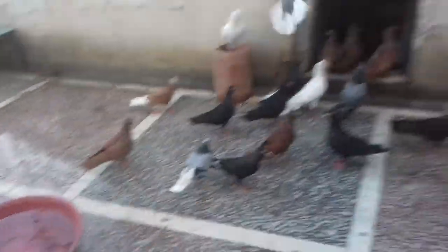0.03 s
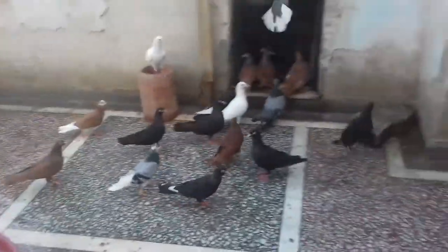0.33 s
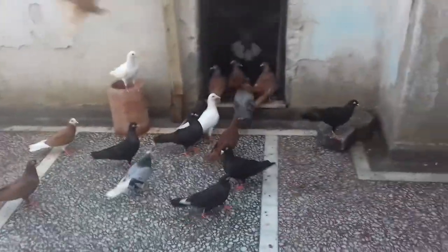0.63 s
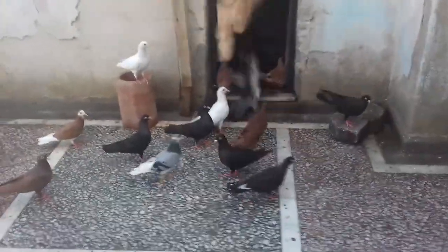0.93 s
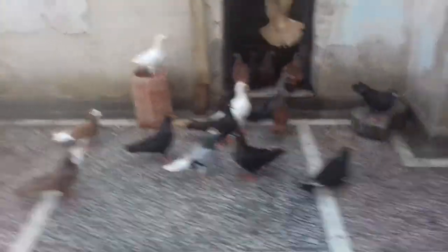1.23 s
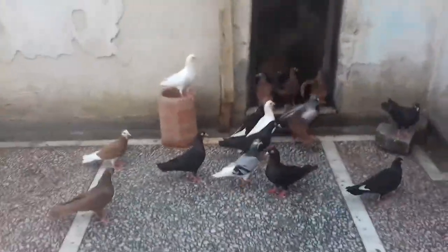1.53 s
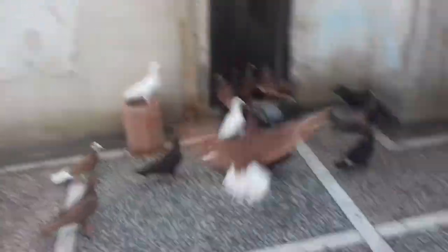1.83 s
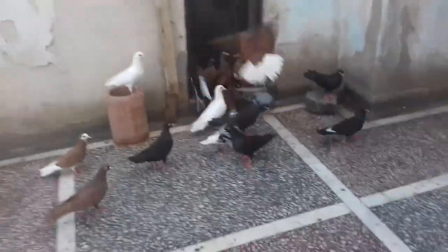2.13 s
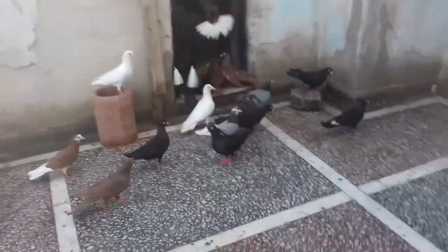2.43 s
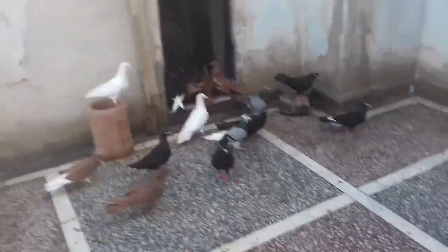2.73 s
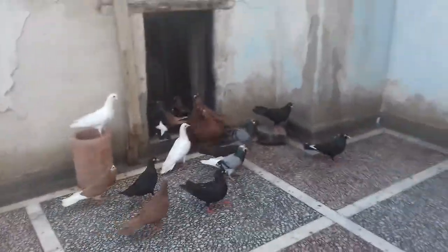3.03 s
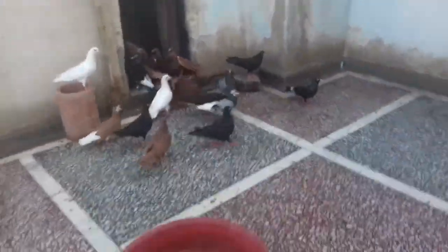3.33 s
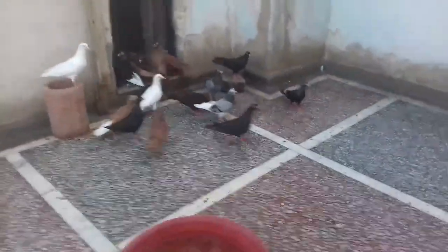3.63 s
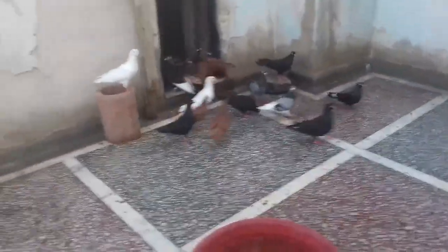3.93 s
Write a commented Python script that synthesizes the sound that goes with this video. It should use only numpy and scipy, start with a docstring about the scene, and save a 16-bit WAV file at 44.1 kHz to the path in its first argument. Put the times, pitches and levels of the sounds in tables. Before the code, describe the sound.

Pigeons flapping their wings on a terrace, with light scuffs, thin squeaks and background hiss.

```python
"""Pigeons crowd round a doorway on a walled terrace. First some fly in: wing tips clap, air swishes
through feathers, faint coos sound among them. From 2 s claws and beaks scuff the stone and young birds
squeak. From 3.2 s one bird beats its wings about ten times a second. The walls throw back short echoes;
outdoor hiss and distant town noise lie under it all."""
import sys
import numpy as np
from scipy import signal
from scipy.fft import rfft, irfft
from scipy.io import wavfile

SR = 44100
rng = np.random.default_rng(int(sys.argv[2]) if len(sys.argv) > 2 else 0)


def log_audio(samples):
    """Write samples as a 16-bit WAV file to the path given in sys.argv[1]."""
    # one column per channel
    frames = np.atleast_2d(samples).T
    # limit to full scale, then quantise
    limited = np.clip(frames, -1, 1)
    pcm = np.round(limited * 32767).astype(np.int16)
    wavfile.write(sys.argv[1], SR, pcm)


N = 176400
T = np.arange(N) / SR

# bright edge of feather noise: freq_hz, level_db
FEATHER_SPECTRUM = [(2500, -4.5), (4500, 11), (6000, 3.5), (7200, 1), (8100, 1), (9500, -5), (11500, -18.5),
                    (16000, -26)]
# body of a wing swish: freq_hz, level_db
SWISH_SPECTRUM = [(150, -60), (600, -10.5), (1500, -13), (2600, -10), (3500, 3), (4100, -3), (5000, -25.5),
                  (6500, -25.5), (9000, -63)]


def from_db(db):
    """Decibels to gain."""
    return 10 ** (np.asarray(db) / 20)


def unit_rms(x):
    """Scale to unit rms."""
    return x / np.sqrt(np.mean(x ** 2) + 1e-20)


def gain_curve(points):
    """Gain over time from rows of time_s, level_db."""
    return from_db(np.interp(T, *np.transpose(points)))


def noise(spectrum):
    """Unit-rms noise shaped by rows of freq_hz, level_db; steep skirts past both ends."""
    freq_hz, level_db = np.transpose(spectrum)
    bins_hz = np.maximum(np.arange(N // 2 + 1) * SR / N, 1)
    skirts = np.minimum(1, np.minimum(bins_hz / freq_hz[0], freq_hz[-1] / bins_hz)) ** 6
    gain = from_db(np.interp(np.log(bins_hz), np.log(freq_hz), level_db))
    return unit_rms(irfft(rfft(rng.standard_normal(N)) * skirts * gain, N))


def drift(corner_hz):
    """Unit-rms random wander, mostly below corner_hz."""
    bins_hz = np.arange(N // 2 + 1) * SR / N
    return unit_rms(irfft(rfft(rng.standard_normal(N)) / (1 + (bins_hz / corner_hz) ** 2), N))


def burst(carrier, start_s, rise_s, hold_s, decay_s):
    """Noise gated by rise, hold and exponential decay; unit rms at the top."""
    age_s = T - start_s
    envelope = np.clip(age_s / rise_s, 0, 1) * np.exp(-np.clip((age_s - rise_s - hold_s) / decay_s, 0, 20))
    gated = carrier * envelope
    return gated * np.sqrt(np.sum(envelope ** 2) / (np.sum(gated ** 2) + 1e-20))


def wing_claps():
    """Wing tips slap together: a crack of a few milliseconds with a bright edge."""
    # claps: start_s, level_db, edge_re_body_db, decay_s
    claps = [(.0718, -14.5, -12.5, 0.0065), (0.1807, -7, -13, 0.0038), (0.302, -9, -8, 0.0037),
             (0.34, -20.5, -10, 0.0084), (0.4503, -18.5, -9, .004), (0.472, -18, -10.5, 0.0047),
             (0.6724, -21, -7, 0.0049), (1.2008, -18, -14.5, 0.0021), (1.611, -19, -14, 0.0043),
             (1.656, -26, -17, 0.0056), (2.7604, -20, -18, 0.0009)]
    # body of the crack: freq_hz, level_db
    body_spectrum = [(100, -37), (350, -24.5), (550, -13), (900, -12), (1400, -19.5), (2300, -6.5),
                     (2850, -8.5), (3450, 5.5), (3850, -1), (4600, -20), (6000, -27), (9000, -66)]
    body, edge, out = noise(body_spectrum), noise(FEATHER_SPECTRUM), 0
    for start_s, level_db, edge_db, decay_s in claps:
        crack = body + from_db(edge_db) * edge
        out += from_db(level_db) * burst(crack, start_s, rise_s=0.0011, hold_s=0.001, decay_s=decay_s)
    return out


def wing_beats():
    """Full, softer beats: a feathery slap with a push of air under it."""
    # beats: start_s, level_db, edge_re_body_db, push_re_body_db
    beats = [(0.938, -18, -12, -11), (3.2014, -26.5, -12.5, -6.5), (3.294, -23, -16.5, -7.5),
             (3.385, -21.5, -20, -17), (3.606, -27, -19, -12), (3.7105, -24, -9.5, -2),
             (3.807, -24.5, -17, -2.5), (3.91, -27, -15, -8)]
    # pushed air: freq_hz, level_db
    push_spectrum = [(200, -13), (500, -8.5), (1000, -7), (1800, 1), (2600, 6.5), (3500, -2)]
    body, edge, push, out = noise(SWISH_SPECTRUM), noise(FEATHER_SPECTRUM), noise(push_spectrum), 0
    for start_s, level_db, edge_db, push_db in beats:
        slap = body + from_db(edge_db) * edge + from_db(push_db) * push
        out += from_db(level_db) * burst(slap, start_s, rise_s=0.0032, hold_s=0.0017, decay_s=0.0082)
    return out


def wing_strokes():
    """Air through feathers swells and fades, grainy as they slide over each other."""
    # soft strokes: peak_s, level_db, edge_re_body_db, decay_s
    strokes = [(0.06, -30, -24, 0.008), (.085, -34, -25, .018), (0.124, -30.5, -26, .012),
               (0.145, -39, -2, 0.0091), (0.239, -30, -22, .008), (0.394, -24.5, -11, 0.0089),
               (0.578, -33.5, -18, 0.029), (0.689, -29, -19.5, 0.039), (0.727, -32, -24, 0.0062),
               (0.754, -30, -18, 0.013), (0.804, -25, -11.5, 0.0077), (0.832, -33, -19, 0.015),
               (0.852, -25, -20.5, .014), (0.888, -32, -11, 0.016), (0.982, -29, -23, 0.018),
               (1.069, -27.5, -15, 0.012), (1.105, -24.5, -10.5, 0.014), (1.178, -31.5, -8, 0.0095),
               (1.286, -24.5, -14, 0.012), (1.361, -26.5, -10, 0.0084), (1.54, -35, -20, 0.034)]
    swell_ratio, grain_depth = 0.69, 0.26
    body, edge, out = noise(SWISH_SPECTRUM), noise(FEATHER_SPECTRUM), 0
    for peak_s, level_db, edge_db, decay_s in strokes:
        swell = ((peak_s - T) / (swell_ratio * decay_s)) ** 2
        fade = (T - peak_s) / decay_s
        envelope = np.exp(-np.minimum(np.where(T < peak_s, swell, fade), 20))
        out += from_db(level_db) * envelope * (body + from_db(edge_db) * edge)
    return out * unit_rms(np.exp(grain_depth * drift(330)))


def floor_scuffs():
    """Claw or beak on stone: a tick and a short resonant scrape."""
    # scuffs: start_s, scrape_db, centre_hz, tick_db
    scuffs = [(2.022, -32, 2150, -44), (2.138, -36, 2980, -50), (2.216, -35.5, 2300, -40),
              (2.397, -32.5, 2650, -36.5), (2.502, -34.5, 3250, -42.5), (2.568, -28.5, 2680, -37),
              (2.647, -33.5, 3450, -39), (2.733, -27.5, 2670, -43), (2.897, -34, 2550, -47),
              (3.058, -31, 2570, -45), (3.233, -33, 2570, -53), (3.545, -46, 2590, -46),
              (3.877, -40, 2550, -41)]
    # contact tick: freq_hz, level_db
    tick_spectrum = [(1500, -25), (4000, -8.5), (6400, 10.5), (8000, -9), (10000, -9.5), (12500, -14),
                     (16000, -13)]
    bandwidth_hz, lowpass_hz = 410, 4500
    white, tick, out = rng.standard_normal(N), noise(tick_spectrum), 0
    for start_s, scrape_db, centre_hz, tick_db in scuffs:
        resonance = signal.lfilter(*signal.iirpeak(centre_hz, centre_hz / bandwidth_hz, fs=SR), white)
        scrape = signal.lfilter(*signal.butter(2, lowpass_hz, fs=SR), resonance)
        out += from_db(scrape_db) * burst(scrape, start_s, rise_s=0.0045, hold_s=0.012, decay_s=0.015)
        out += from_db(tick_db) * burst(tick, start_s, rise_s=0.00077, hold_s=0, decay_s=0.0029)
    return out


def calls(notes, waver_depth, rasp_depth):
    """Gliding tones plus octave, each swelling and fading; pitch wavers, level flutters fast."""
    waver, out = 1 + waver_depth * drift(117), 0
    for start_s, length_s, level_db, first_hz, mid_hz, last_hz, octave_db in notes:
        progress = np.clip((T - start_s) / length_s, 0, 1)
        pitch_hz = np.interp(progress, [0, .5, 1], [first_hz, mid_hz, last_hz]) * waver
        phase = 2 * np.pi * np.cumsum(pitch_hz) / SR
        tone = np.sin(phase) + from_db(octave_db) * np.sin(2 * phase)
        out += from_db(level_db) * np.sin(np.pi * progress) * tone
    return out * unit_rms(np.exp(rasp_depth * drift(200)))


def squeaks():
    """Thin, high calls of young birds."""
    # squeaks: start_s, length_s, level_db, first_hz, mid_hz, last_hz, octave_db
    notes = [(2.568, 0.036, -30, 2550, 2586, 2620, -34), (2.685, .085, -34, 2460, 2730, 2940, -32),
             (2.722, 0.052, -38, 3040, 2970, 2856, -13), (2.742, 0.091, -29.5, 2876, 2804, 2770, -19),
             (2.995, 0.06, -41, 4470, 4580, 4400, -21), (3.075, .06, -42, 4350, 4500, 4380, -13.5),
             (3.115, 0.062, -34, 4280, 4060, 4060, -42)]
    return calls(notes, waver_depth=0.012, rasp_depth=0.36)


def coos():
    """Faint, short hoots."""
    # coos: start_s, length_s, level_db, first_hz, mid_hz, last_hz, octave_db
    notes = [(.06, 0.05, -36.5, 800, 775, 800, -18), (.09, 0.08, -39.5, 665, 619, 556, -23),
             (.215, 0.063, -39.5, 657, 638, 645, -21), (.29, 0.041, -37, 563, 530, 520, -23),
             (.72, 0.053, -36.5, 720, 782, 805, -18), (.80, 0.052, -40, 730, 763, 790, -21),
             (.858, 0.047, -32.5, 790, 813, 850, -9), (.965, 0.053, -35, 804, 829, 780, -9),
             (1.09, .04, -38.5, 840, 787, 746, -18)]
    return calls(notes, waver_depth=0.0325, rasp_depth=0.41)


def terrace(source, tail_db):
    """Direct sound, wall echoes and a short diffuse tail."""
    # wall echoes: delay_s, level_db
    echoes = [(.0138, -12), (.0202, -12), (.041, -24.5)]
    t60_s, build_s = 0.22, 0.0095
    age_s = T[:SR // 2]
    tail = rng.standard_normal(len(age_s)) * from_db(-60 * age_s / t60_s) * np.minimum(age_s / build_s, 1)
    response = from_db(tail_db) * tail / np.sqrt(np.sum(tail ** 2))
    response[0] = 1
    for delay_s, level_db in echoes:
        response[int(delay_s * SR)] += from_db(level_db)
    return signal.fftconvolve(source, response)[:N]


def noise_bed(spectrum, levels, flicker_db, flicker_hz):
    """Continuous noise on a level curve, with random flicker."""
    return noise(spectrum) * gain_curve(levels) * from_db(flicker_db * drift(flicker_hz))


def plumage_rustle():
    """Fine feather noise, dying down."""
    # rustle: time_s, level_db
    levels = [(0, -48.5), (.9, -50.5), (1.4, -52), (2, -56), (2.6, -56.5), (2.9, -62), (4, -59)]
    return noise_bed(FEATHER_SPECTRUM, levels, flicker_db=2.5, flicker_hz=30)


def outdoor_hiss():
    """Hiss, strongest near 3.5 kHz."""
    # hiss: freq_hz, density_db
    spectrum = [(1200, -20), (2000, -14), (2800, -4.5), (3450, 1.5), (3850, -2), (4300, -10.5), (5000, -19),
                (6200, -21.5), (7500, -35.5), (9300, -41), (11500, -43), (16000, -45)]
    # hiss: time_s, level_db
    levels = [(0, -31.5), (.55, -32), (.9, -31.5), (1.15, -34), (1.42, -34.5), (1.7, -33.5), (2.25, -36),
              (2.65, -35.5), (2.95, -37), (4, -36.5)]
    return noise_bed(spectrum, levels, flicker_db=0.95, flicker_hz=25)


def distant_town():
    """Broad midrange wash."""
    # town noise: freq_hz, density_db
    spectrum = [(20, -50), (50, -21.5), (140, -16.5), (250, -13.5), (350, -10.5), (680, -4.5), (1040, -3.5),
                (1400, -4.5), (2000, -4), (2860, -9), (3600, -45)]
    # town noise: time_s, level_db
    levels = [(0, -35.5), (.9, -37.5), (1.7, -36.5), (2.25, -39), (2.7, -38.5), (4, -39)]
    return noise_bed(spectrum, levels, flicker_db=0.8, flicker_hz=31)


def hum():
    """Faint low tones wavering in level and phase."""
    # tones: pitch_hz, first_db, last_db
    tones = [(60.6, -83, -65), (146, -60.5, -80), (193, -53, -81), (317, -63, -67)]
    waver_db, waver_rad, out = 2, 1.1, 0
    for pitch_hz, first_db, last_db in tones:
        gain = from_db(np.linspace(first_db, last_db, N) + waver_db * drift(1.5))
        out += gain * np.sin(2 * np.pi * pitch_hz * T + waver_rad * drift(1.8))
    return out


def rumble():
    """Faint low noise that swells twice."""
    # rumble: freq_hz, density_db
    spectrum = [(25, -24), (45, -4), (60, -4), (78, -8), (100, 4), (220, -14)]
    # rumble: time_s, level_db
    levels = [(0, -78), (1.0, -74), (1.6, -62), (2.2, -72), (2.9, -71), (3.5, -65), (4, -66)]
    return noise(spectrum) * gain_curve(levels)


def scene():
    """Wings, feet and calls between the walls, over the background; mono."""
    movement = terrace(wing_claps() + wing_beats() + wing_strokes() + floor_scuffs(), tail_db=-12.5)
    voices = terrace(squeaks() + coos(), tail_db=-8)
    background = distant_town() + outdoor_hiss() + plumage_rustle() + hum() + rumble()
    return (movement + voices + background)[None]


def record(dry):
    """Soft clip, then a steep low-pass."""
    cutoff_hz = 15900
    rounded = 0.86 * np.tanh(dry / 0.94)
    return signal.sosfilt(signal.ellip(10, .1, 70, cutoff_hz, fs=SR, output="sos"), rounded)


dry = scene()
out = record(dry)
log_audio(out)
```